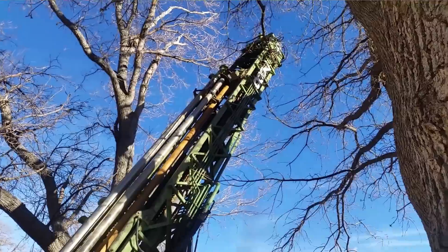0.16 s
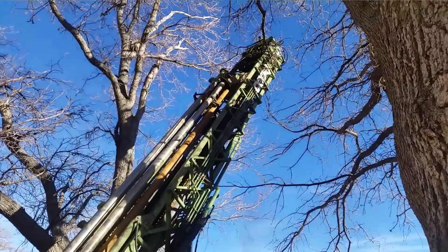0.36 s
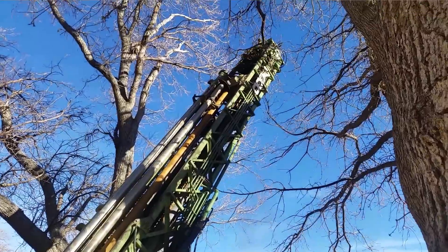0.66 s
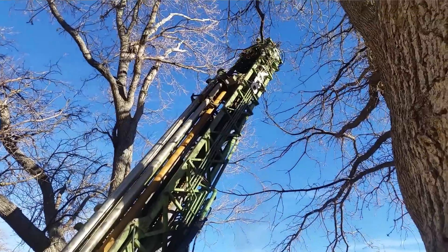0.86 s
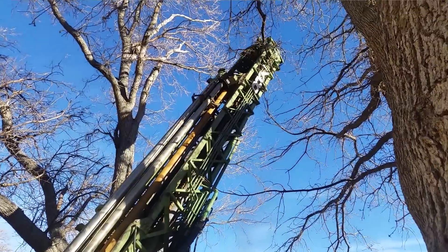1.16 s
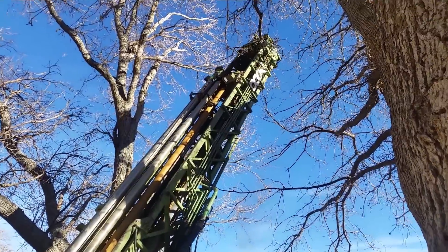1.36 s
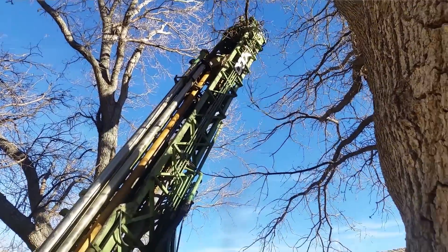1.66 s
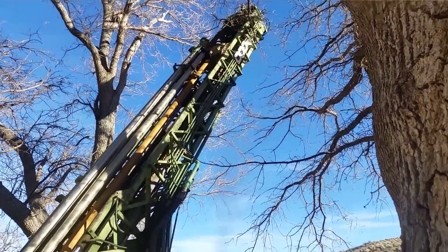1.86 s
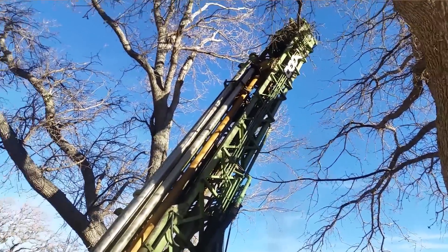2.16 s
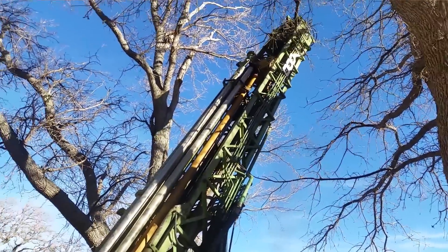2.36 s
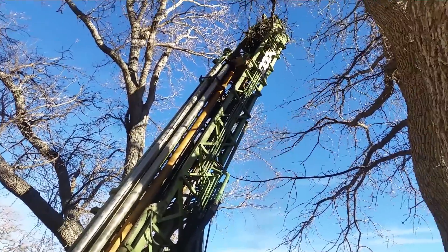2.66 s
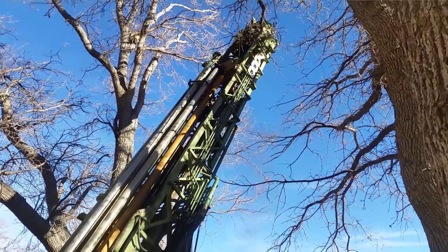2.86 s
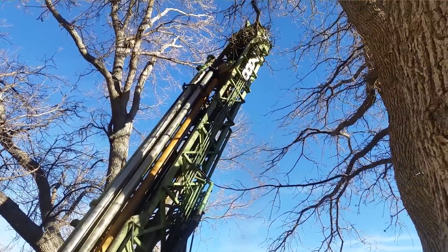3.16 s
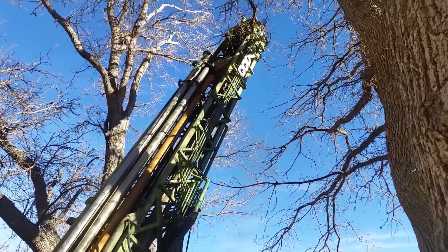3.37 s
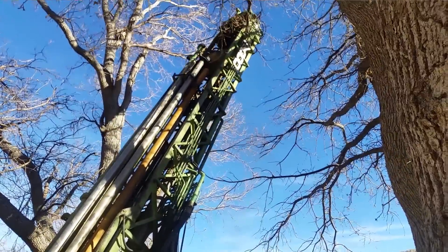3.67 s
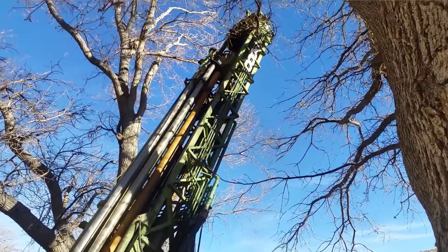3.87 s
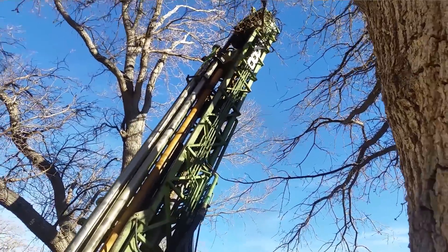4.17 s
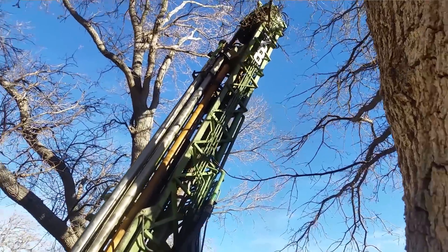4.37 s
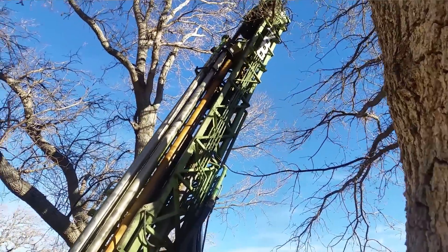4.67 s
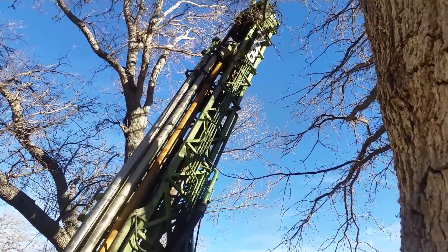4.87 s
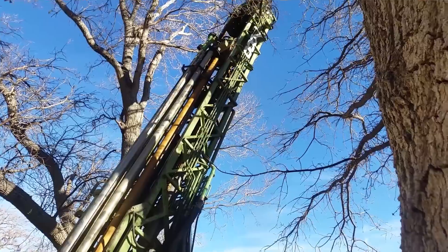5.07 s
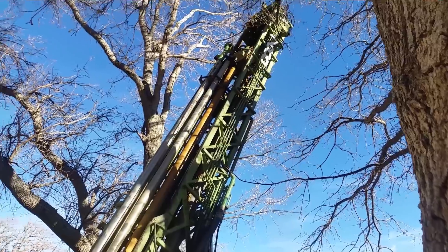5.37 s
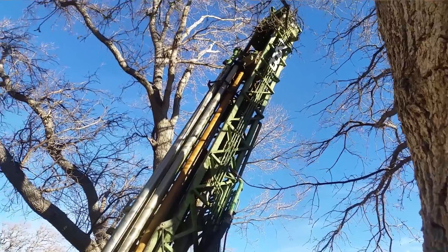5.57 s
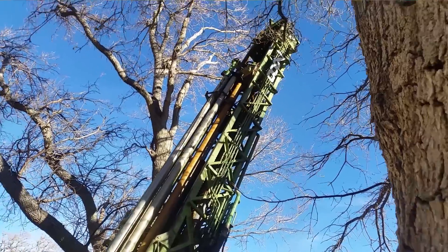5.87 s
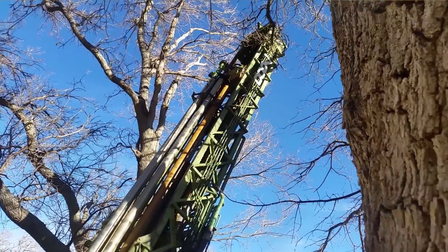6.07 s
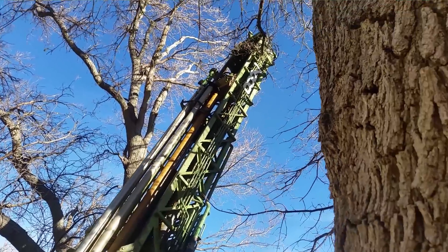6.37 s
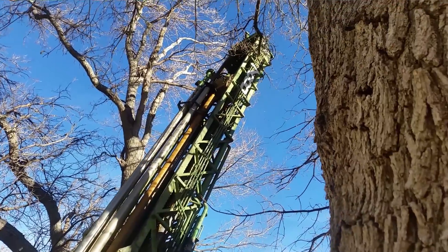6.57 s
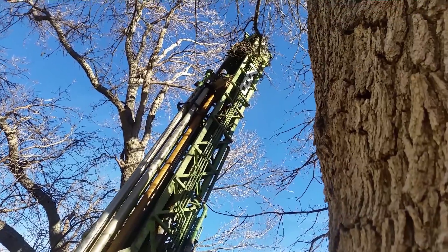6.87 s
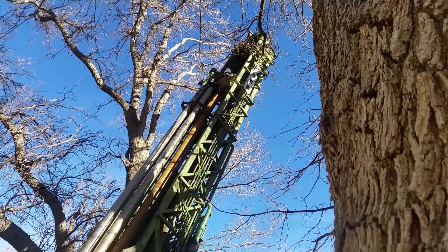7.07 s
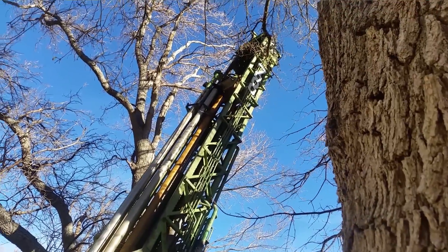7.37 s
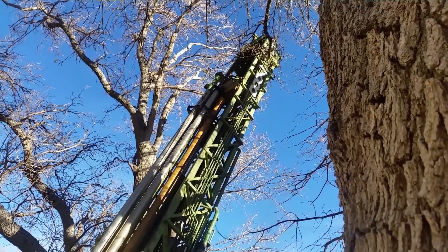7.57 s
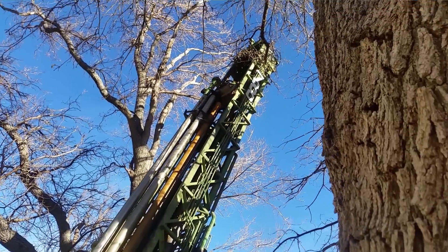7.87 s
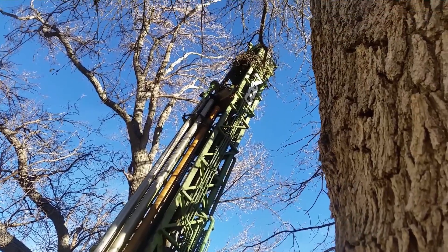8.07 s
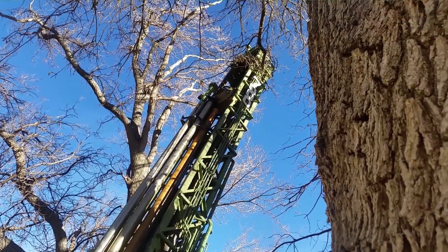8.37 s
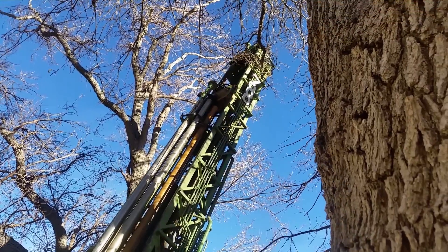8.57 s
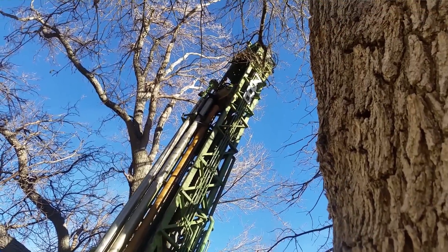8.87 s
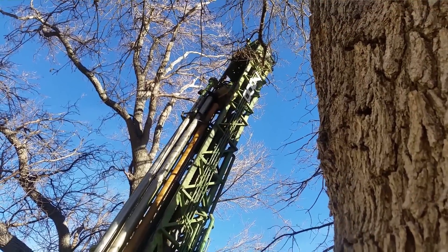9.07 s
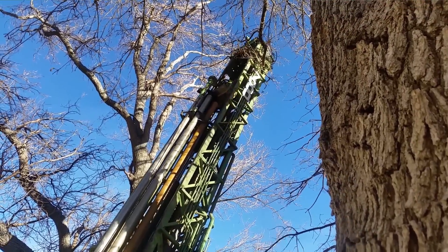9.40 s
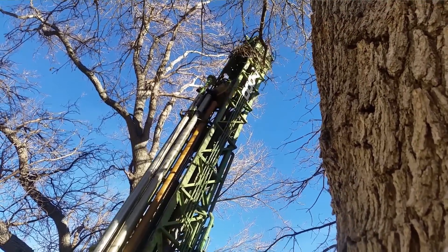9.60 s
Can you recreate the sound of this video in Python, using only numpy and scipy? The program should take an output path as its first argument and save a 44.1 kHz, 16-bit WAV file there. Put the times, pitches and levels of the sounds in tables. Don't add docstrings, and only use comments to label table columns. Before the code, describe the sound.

Outdoors near a drilling truck, a heavy diesel idles with a deep, slightly buzzing hum, muffled knocking and a steady bright air hiss. Its pitch eases slightly down, then up. Around four seconds a faint distant engine hum joins, rising and later sagging. The handheld stereo microphone sways, and the hiss dulls on the right after six seconds.

```python
import sys
import numpy as np
from scipy import signal
from scipy.fft import rfft, irfft, next_fast_len
from scipy.io import wavfile
from scipy.ndimage import uniform_filter1d, map_coordinates

SR = 44100
rng = np.random.default_rng(int(sys.argv[2]) if len(sys.argv) > 2 else 0)


def inscribe(sig):
    pcm = np.round(np.clip(np.atleast_2d(sig).T, -1, 1) * 32767)
    wavfile.write(sys.argv[1], SR, pcm.astype(np.int16))


def rack_gain(trim_db):
    fader = np.asarray(trim_db, float)
    return 10 ** (fader / 20)


N = 429534
SIZE = next_fast_len(N)
HZ = np.maximum(np.arange(SIZE // 2 + 1) * SR / SIZE, 1)
SECONDS = np.arange(N) / SR
LEFT_RIGHT = np.array([[1], [-1]])


def rms_one(x):
    return x / np.sqrt(np.mean(x ** 2) + 1e-20)


def in_time(rows):
    s, *columns = np.transpose(rows)
    return [np.interp(SECONDS, s, column) for column in columns]


def at_hz(points):
    hz, value = np.transpose(points)
    return np.interp(np.log(HZ), np.log(hz), value)


def coloured(x, gain):
    return irfft(rfft(x, SIZE) * gain, SIZE)[..., :N]


def drift(rate, size=N):
    r = np.exp(-400 * np.pi * rate / SR)
    noise = rng.standard_normal(N // 200 + 502)
    slow = signal.lfilter([1], [1, -2 * r, r * r], noise)[500:]
    return np.interp(np.linspace(0, N / 200, size), np.arange(len(slow)), rms_one(slow))


def two_ports(near, other, swayed=None):
    # f/Hz, likeness (0-1)
    likeness = [(60, .9), (130, .88), (300, .96), (1000, .86), (1500, .55), (3000, .55), (5200, .72),
                (6500, .5), (8500, .8), (9600, .35), (11000, .86), (15500, .8)]
    # f/Hz, left leads/rad
    lead = [(30, 0.5), (1000, -0.2), (1750, -0.7), (2400, -1.16), (3400, -3.6), (5000, -6.5), (6400, -5.8),
            (8800, -5.8), (9500, -7), (10000, -9.7), (11000, -10.3), (12700, -13.4), (13300, -11.2),
            (14500, -12.7), (15800, -13)]
    alike = np.clip(at_hz(likeness), 0, 1)
    gain = alike * np.exp(-1j * at_hz(lead))
    shared = coloured(near, gain)
    if swayed is not None:
        short = coloured(near, gain / (1 + (4300 / HZ) ** 8))
        shared += map_coordinates(short, [np.arange(N) - swayed], order=5, mode="mirror") - short
    return np.array([near, shared + coloured(other, np.sqrt(1 - alike ** 2))])


def exhaust(cycles, firing_db, second_db, swell_db):
    # multiple of the engine cycle, loaded level/dB, easing level/dB, eased level/dB
    order_db = [(4, -56, -60, -59), (7, -70, -51, -73), (9, -68, -71, -52), (14, -67, -55, -56),
                (15, -48, -56, -49), (16, -64, -45, -58), (17, -49, -59, -65), (18, -44, -57, -60),
                (20, -54, -61, -54), (22, -53, -57, -62), (23, -52, -60, -60), (24, -46, -47, -48),
                (26, -51, -50, -52), (27, -55, -72, -61), (28, -58, -54, -57), (33, -62, -60, -55),
                (36, -57, -52, -50), (46, -63, -60, -56), (54, -58, -63, -70), (58, -72, -55, -58),
                (60, -74, -54, -62), (69, -56, -58, -69), (70, -73, -55, -68), (75, -70, -62, -54),
                (79, -56, -61, -64), (95, -55, -63, -64)]
    high_order_db = [(111, -74, -58, -65), (112, -62, -57, -76), (113, -57, -73, -63)]
    # f/Hz, loaded level/dB, easing level/dB, eased level/dB
    pump_db = [
        (281, -64, -57, -51),
        (819, -57, -70, -70),
        (891, -55, -54, -62),
    ]
    load_steps_s = [
        2.1,
        2.9,
        5.0,
        5.8,
    ]

    coarse = 16
    cycles, swell_db = cycles[::coarse], swell_db[::coarse]
    s = SECONDS[::coarse]
    twist = np.interp(s, [4, 6], [-1.8, -5.2])

    out = rack_gain(firing_db[::coarse]) * np.cos(12 * np.pi * cycles + .06 * LEFT_RIGHT)
    out += rack_gain(second_db[::coarse]) * np.cos(24 * np.pi * cycles + twist + 0.073 * LEFT_RIGHT)

    strong = np.array(order_db)[:, 0]
    faint = [(order, *rng.normal(-65, 3.5, size=3)) for order in range(21, 94, 3) if order not in strong]
    lines = []
    for order, *levels in order_db + faint + high_order_db:
        if order % 6 == 0:
            start = (order / 6 - 1) * twist / 2 / np.pi
        else:
            start = rng.random()
        lines.append((order * cycles + start, levels))
    lines += [(hz * s, levels) for hz, *levels in pump_db]

    for turns, (loaded_db, easing_db, eased_db) in lines:
        level_db = np.interp(s, load_steps_s, [loaded_db, easing_db, easing_db, eased_db])
        level_db += .6 + .7 * swell_db + 1.5 * drift(.8, size=len(s))
        out += rack_gain(level_db) * np.cos(2 * np.pi * turns + 0.086 * rng.standard_normal() * LEFT_RIGHT)
    return np.sqrt(2) * signal.resample_poly(out, coarse, 1, axis=1)[:, :N]


def knock(cycles, repeat):
    cylinder_db = [-1.5, -5.5, -2, 0, 0, -4.5]
    within = cycles % 1
    strength = rack_gain(np.array(cylinder_db))[(6 * within).astype(int)]
    burst = 1.17 + strength * np.exp(-2.2 * (6 * within % 1))
    rattle = rng.standard_normal(1024)[(1024 * within).astype(int)]
    fresh = rng.standard_normal(N)
    return rms_one(burst * (repeat * rattle + np.sqrt(1 - repeat ** 2) * fresh))


def roar(cycles, roar_db):
    # f/Hz, level/dB per Hz
    spectrum = [(25, -20), (45, -7.5), (80, -0.5), (130, -1), (200, -4), (270, -5), (390, -13), (550, -9.5),
                (900, -12.5), (1100, -11.5), (1450, -12.5), (2000, -12.5), (2400, -22.5), (3000, -51)]
    # f/Hz, width/Hz, level/dB
    block = [
        (540, 12, -3.5),
        (680, 220, 2.5),
        (884, 63, 1.5),
        (988, 88, 4),
        (1745, 180, 8.5),
        (1890, 65, 2),
    ]
    # f/Hz, left over right/dB
    roar_tilt = [(60, 9.5), (300, -2), (800, -2.5), (1200, 0.5), (2500, -1.5)]
    peaks_db = sum(db / (1 + (2 * (HZ - hz) / width) ** 2) for hz, width, db in block)
    knocking = 1 / (1 + (950 / HZ) ** 4)
    paths = []
    for _ in range(2):
        clatter = coloured(knock(cycles, repeat=0.5), np.sqrt(knocking))
        rumble = coloured(rng.standard_normal(N), np.sqrt(1 - knocking))
        paths.append(clatter + rumble)
    tilt_db = at_hz(roar_tilt) / 2 * LEFT_RIGHT
    pair = coloured(two_ports(*paths), rack_gain(at_hz(spectrum) + peaks_db + tilt_db))
    return rack_gain(roar_db + 1.5 + 0.47 * drift(5.4)) * rms_one(pair)


def air_hiss(swell_db):
    # t/s, extra delay at the right port/us
    sway = [(0, 1), (1.55, 6), (1.9, 40), (2.22, -17), (2.55, -23), (2.8, -6), (3.27, 10.5), (3.54, 13),
            (3.74, 34), (3.94, -14), (4.3, -3), (4.5, -17), (5.14, -2), (5.9, -64), (6.55, 4), (7.5, -17),
            (8.34, -1), (9.5, -7)]
    # t/s, turned away (0-1)
    turn = [(0, .1), (.5, 0), (1.0, 0.23), (1.3, 0.05), (1.7, 0.37), (2.6, 0), (3.15, .1), (3.55, 0.37),
            (3.9, 0), (4.55, 0.17), (4.95, 0), (5.7, 0.1), (6.1, 0.66), (6.6, 0.9), (7.3, 0.87),
            (8.0, 0.97), (9.74, 1.15)]
    # t/s, share
    shading = [
        (0, -.3),
        (.9, 0.72),
        (2.1, 0.83),
        (2.75, -1.4),
        (3.5, 1.2),
        (4.0, -.7),
        (5.9, -0.72),
        (6.6, 1.7),
        (8.7, 2),
        (9.74, 1.5),
    ]
    # f/Hz, level/dB per Hz
    left_facing = [(2300, -6.1), (3150, -7.0), (3700, -18.5), (5000, -15.3), (6500, -11.9), (8300, -9.5),
                   (9600, -3.8), (10300, 3.6), (11500, 10.4), (12400, 6.4), (13000, 0.9), (13600, 5.0),
                   (14400, 6.8), (15700, 6.8)]
    left_turned = [(2300, -8.1), (3200, -5.0), (3750, -19), (5000, -15.3), (6500, -13.1), (8300, -9.0),
                   (9400, -7.5), (10300, 8.1), (11500, 11.4), (12400, 8.5), (13000, 1.7), (13550, -3.5),
                   (14400, 3.7), (15300, 9.0)]
    right_facing = [(2300, -3.0), (3000, 1.1), (4000, -2.3), (5400, -6.1), (6100, -12.6), (7500, -10.1),
                    (8300, -2.4), (9500, 5.1), (10400, 7.0), (11500, 4.9), (13000, 3.5), (14200, 3.1),
                    (15200, 1.9), (15700, -1.6)]
    right_turned = [(2300, -7.3), (3000, -3.1), (4000, -8.5), (5400, -11.3), (6100, -15.3), (7500, -14.1),
                    (8300, -8), (9500, -2.0), (10400, 0.0), (11500, -4.2), (13000, -4.7), (14200, -5.1),
                    (15200, -6.8), (15700, -14)]

    (turned,), (dulling,) = in_time(turn), in_time(shading)
    follow_db = .65 * swell_db
    left_db = -22.5 + 2.5 * turned + follow_db
    right_db = -25 - 9 * turned + follow_db
    turned = np.clip(turned, -.3, 1.2)
    swayed = in_time(sway)[0] * SR / 820000.0
    left, right = two_ports(*rng.standard_normal((2, N)), swayed=swayed)
    low_cut = 1 / np.sqrt(1 + (2200 / HZ) ** 12)
    ports = [(left, left_db, left_facing, left_turned), (right, right_db, right_facing, right_turned)]
    out = []
    for x, level_db, facing, away in ports:
        before = rms_one(coloured(x, low_cut * rack_gain(at_hz(facing))))
        after = rms_one(coloured(x, low_cut * rack_gain(at_hz(away))))
        blend = (1 - turned) * before + turned * after
        out.append(rack_gain(level_db + 0.72 * drift(3.9)) * blend)
    top = coloured(out[1], 1 / (1 + (12800 / HZ) ** 10))
    out[1] = out[1] + (rack_gain(-3.0 * (dulling - turned)) - 1) * top
    return np.array(out)


def far_engine():
    # t/s, f/Hz, level/dB
    far = [
        (3.6, 67.1, -57),
        (4.4, 63.2, -54),
        (5.2, 70, -44),
        (5.6, 74.57, -41),
        (6.4, 81.1, -45),
        (7.2, 84.1, -43),
        (8.0, 83.6, -45),
        (8.8, 81.1, -44),
        (9.6, 77.5, -43),
    ]
    hz, level_db = in_time(far)
    fade = np.clip((SECONDS - far[0][0]) / .4, 0, 1)
    return np.sqrt(2) * fade * rack_gain(level_db) * np.sin(2 * np.pi * np.cumsum(hz) / SR)


def scene():
    # t/s, level/dB
    nearness = [(0, -36.5), (1.2, -38), (1.45, -37), (1.92, -39.3), (2.5, -37), (2.9, -39.5), (3.7, -39),
                (4.65, -39), (5.0, -36.8), (5.8, -37.5), (6.05, -40), (6.65, -38), (7.0, -40.5),
                (7.62, -37.5), (7.82, -41.5), (8.4, -40.5), (9.25, -43.8), (9.74, -41)]
    # t/s, firing rate f/Hz
    speed = [(0.0, 52.39), (0.4, 52.1), (0.8, 51.65), (1.4, 51.3), (2.2, 51.9), (2.4, 52.96), (2.6, 53.65),
             (3.1, 54.28), (3.6, 54.01), (4.2, 54.28), (6.6, 54.91), (8.4, 54.88), (9.0, 54.57),
             (9.6, 54.98)]
    # t/s, level over loudness/dB
    second = [(0, 2.5), (1.4, 3), (2.3, 3.5), (2.7, 0.5), (4.0, -0.5), (4.25, -10), (5.5, -19), (6.2, -6),
              (8.6, -3.5), (8.95, -9), (9.6, -2)]
    near_db, = in_time(nearness)
    firing_db = near_db + 4.9 + 0.29 * SECONDS
    second_db = near_db + in_time(second)[0]
    cycles = np.cumsum(in_time(speed)[0]) / SR / 6 + .92
    swell_db = near_db - uniform_filter1d(near_db, size=3 * SR, mode="nearest")
    hum = exhaust(cycles, firing_db, second_db, swell_db) + far_engine()
    return hum * rack_gain(.2 * LEFT_RIGHT) + roar(cycles, near_db + 1.17) + air_hiss(swell_db)


def thinned(x):
    # f/Hz, share of narrow bands dropped
    dropouts = [(1500, 0), (3000, .02), (4500, .1), (6500, .12), (8500, .05), (10500, .01), (15000, .01)]
    hz, _, cells = signal.stft(x, SR, nperseg=2048)
    share = np.interp(hz, *np.transpose(dropouts))[:, None]
    lots = rng.random((2, len(hz) // 8 + 1, cells.shape[2] // 2 + 1))
    lots = lots.repeat(8, axis=1).repeat(2, axis=2)
    kept = lots[:, :len(hz), :cells.shape[2]] > share
    usual = uniform_filter1d(uniform_filter1d(abs(cells), size=16, axis=1), size=5, axis=2)
    kept &= (abs(cells) > .6 * usual) | (hz[:, None] < 1400)
    below_cut = hz[:, None] < 15830
    return signal.istft(cells * kept * below_cut, SR, nperseg=2048)[1][:, :N]


def top_cut(x):
    return signal.sosfilt(signal.butter(12, 16240, fs=SR, output="sos"), x)


def record(dry):
    mix = thinned(dry)
    return top_cut(mix)


dry = scene()
out = record(dry)
inscribe(out)
```